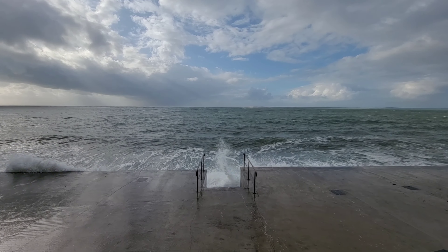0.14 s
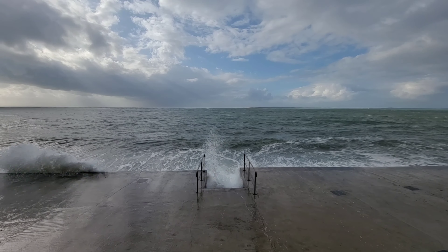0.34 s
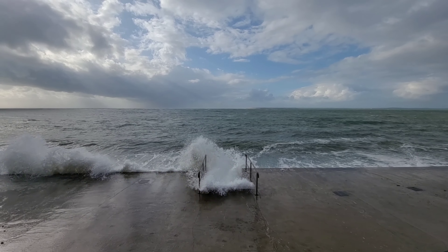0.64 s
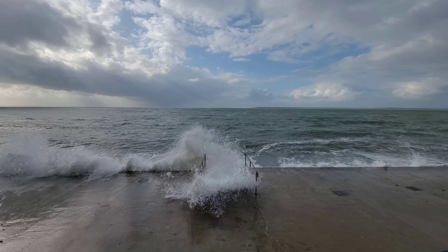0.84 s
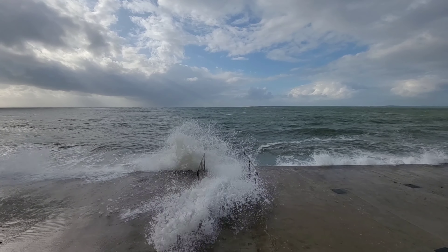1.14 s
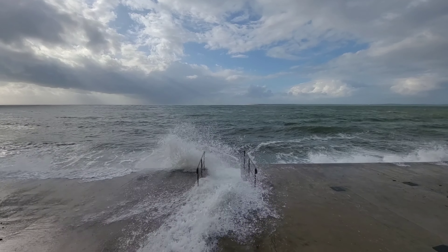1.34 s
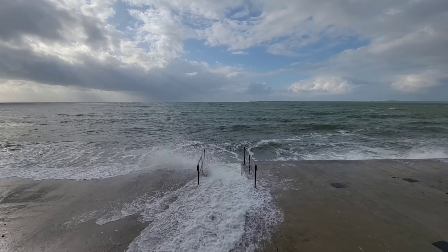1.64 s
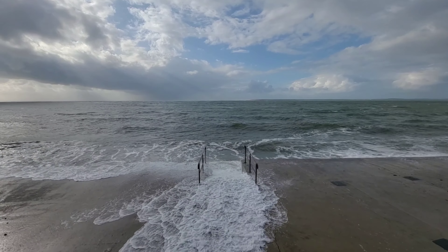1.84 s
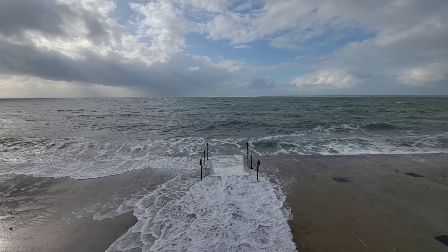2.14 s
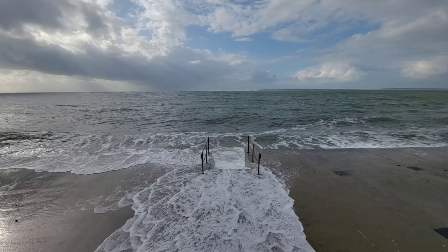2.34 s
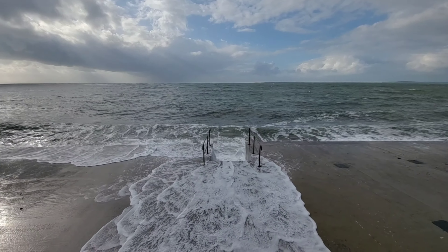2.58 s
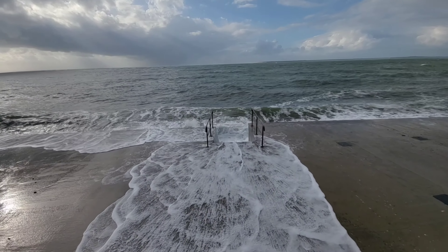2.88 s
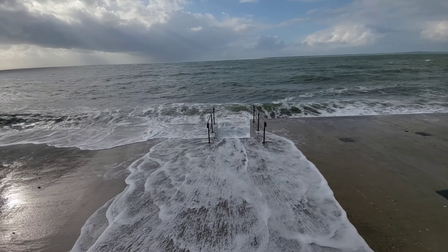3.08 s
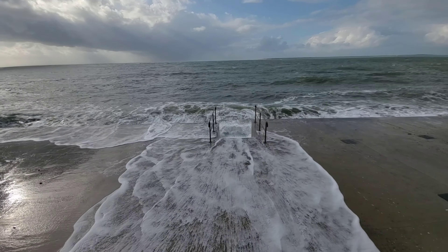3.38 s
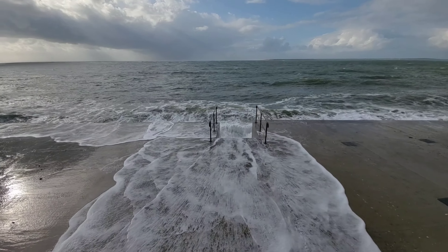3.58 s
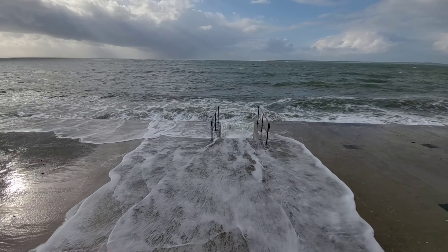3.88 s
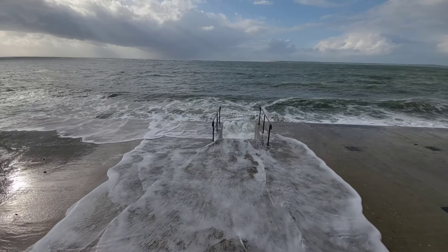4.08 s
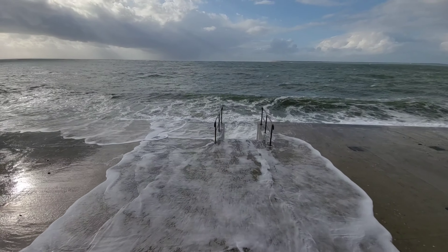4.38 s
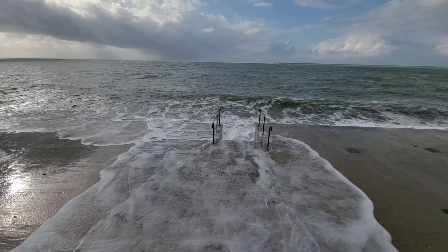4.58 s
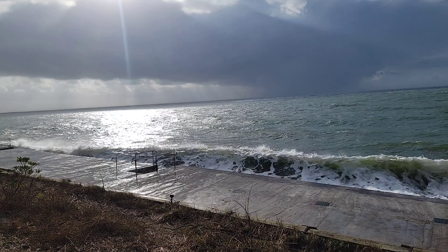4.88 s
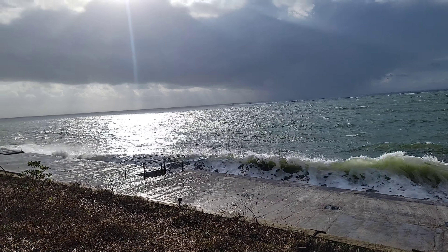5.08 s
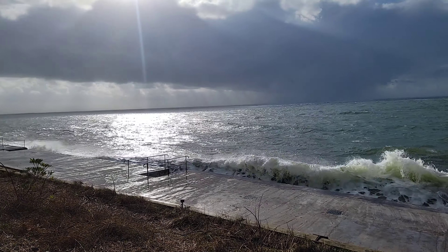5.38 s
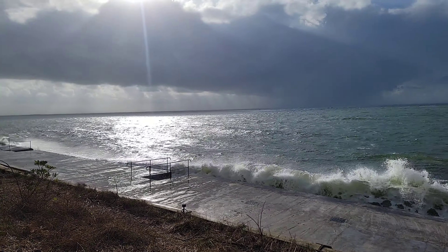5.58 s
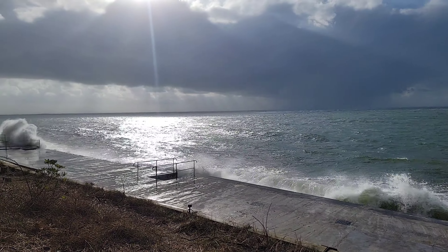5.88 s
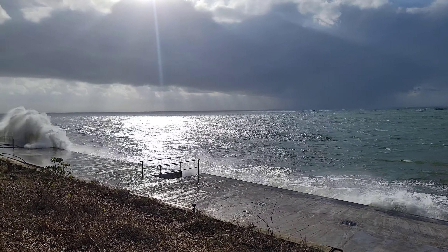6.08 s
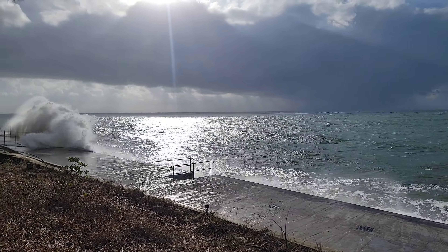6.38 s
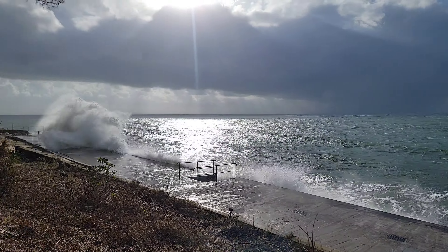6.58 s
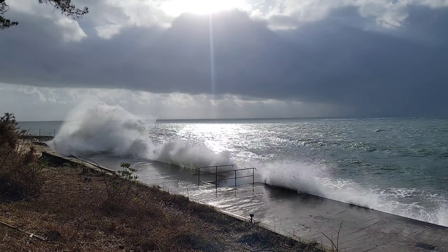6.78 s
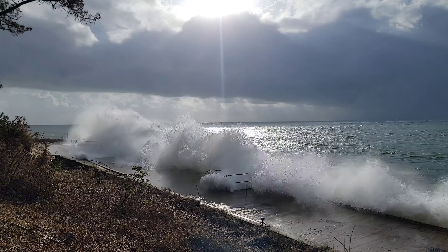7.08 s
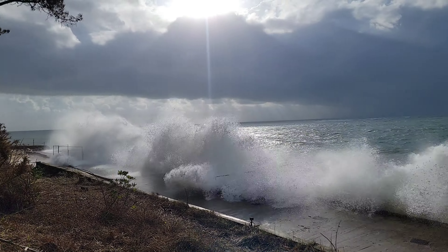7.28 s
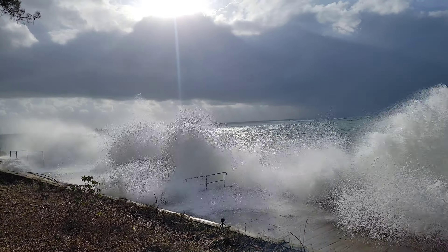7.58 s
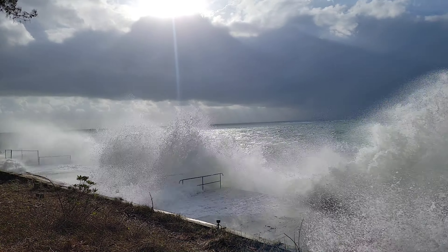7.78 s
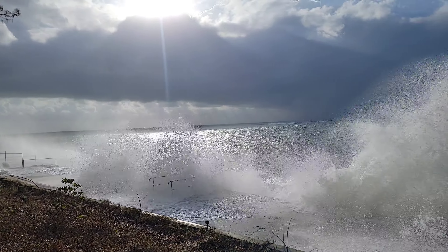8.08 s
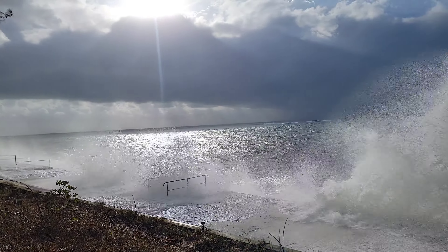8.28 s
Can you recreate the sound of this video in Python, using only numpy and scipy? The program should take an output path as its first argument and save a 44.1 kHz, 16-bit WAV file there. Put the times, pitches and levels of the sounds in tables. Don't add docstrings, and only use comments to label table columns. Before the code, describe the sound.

Rough sea crashing on a concrete seawall, watery roar, spatter and fizz, a short dropout, then heavy wind buffeting and a rising burst of spray.

```python
import sys
import numpy as np
from scipy import signal
from scipy.io import wavfile
from scipy.ndimage import uniform_filter1d

SR = 44100
rng = np.random.default_rng(int(sys.argv[2]) if len(sys.argv) > 2 else 0)


def convert_level_to_amplitude(level_db):
    exponent = np.asarray(level_db, float) / 20
    return 10 ** exponent


def generate_wav(signal):
    frames = np.transpose(np.atleast_2d(signal))
    scaled = np.clip(frames, -1, 1) * 32767
    pcm = np.round(scaled).astype(np.int16)
    wavfile.write(sys.argv[1], SR, pcm)


N = 372204
CUT_S, START_S, RESET_S = 4.7605, 4.9135, 6.6825

# time in seconds, tumble in dB, spray in dB,
# fineness of the drops in dB, lean to the left in dB.
SURF = [(0, -33.5, -25, 9.5, 1.5), (.7, -31.5, -20.5, 0.5, 1), (1.1, -32, -15, 8.5, 3),
        (1.62, -30, -11.5, 6.5, 0.5), (1.95, -38.5, -15.5, 0, -2.5), (2.16, -40, -33, 6.5, -1),
        (2.75, -38.5, -31.5, 2.5, -1), (3.55, -33, -22, -0.5, -1.5), (4.32, -33, -21, -4, -4),
        (4.77, -37.5, -27.5, -3, 4.5), (4.9, -31.5, -36.5, 1, 1), (5.5, -34, -36, -1, 0.1),
        (5.8, -29.5, -29, 0.1, 1), (6.56, -30.5, -32.5, -1.5, 1), (6.64, -26.5, -29.5, 0.5, 0.8),
        (7.75, -26.5, -21.5, 2, -1), (7.83, -25, -16.5, 3.5, 0.1), (8.44, -23.5, -18, 2, 0.7)]
# middle in seconds, half width in seconds,
# tumble in dB, spray in dB, extra depth in dB.
HEAVES = [(.02, 0.23, 2, 0, -7), (.13, 0.12, -3, -3, 7), (.27, 0.15, 1.5, 1, 2.5), (.58, .09, 1.5, 3.5, 6),
          (.85, .08, -1, 1, -5), (.97, 0.097, 3, 0.3, -3), (1.16, 0.1, 0, 1, 1), (1.31, 0.28, 5, 1.5, -3),
          (1.51, 0.18, 2, -2.2, -8.5), (1.65, .12, -.6, -0.7, -11), (1.9, .2, 2.5, -1.3, -2),
          (2.24, .06, 2, 1, 5), (2.9, 0.39, 0, -0.5, -3), (3.21, .08, 2.5, -1, -1),
          (3.35, 0.14, 0.3, -2.5, -1.5), (3.92, 0.25, -1.5, -1.6, 0), (5.2, 0.14, 0, 2.5, -1),
          (6.05, .15, 2.5, 1.5, 6), (6.63, .04, 1, -2.7, 6), (6.68, 0.036, 1.5, -3.5, 10),
          (7.14, .1, 0.5, 1.1, -2), (7.6, 0.17, 1.9, 0.2, -6), (8.05, 0.22, 1.8, 2.5, 5.5)]
# time in seconds, change of the water level in dB, 60 dB
# decay in seconds.
SLAPS = [
    (.255, 6, .1),
    (.367, 5, 0.076),
    (.457, 1.5, .05),
    (.583, 3.5, 0.085),
    (.804, 6.5, 0.052),
    (1.131, 4, 0.055),
    (1.28, 5, 0.043),
    (1.445, 3.5, .08),
    (6.62, 3.5, .15),
    (7.79, -2, 0.13),
]
# depth of the tumble
# in dB, its loss in dB per dB of heavy spray, mist below the spray in dB, crispness in dB.
DROPS = [(0, 0.8, -22, -2.15), (-4.1, .3, -18, -1.7), (-2.2, 0.9, -17.5, -3.2)]
# tumble left of right in dB, spray left of right
# in dB, wind right of left in dB, right port trim in dB.
PORTS = [
    (-16.5, -30.5, -4, -0.13),
    (-17.5, -22.5, 14, -0.07),
    (-17, -22, 0.7, -2),
]
# frequency in Hz, level in dB.
LEFT_SLIPWAY = [(300, 21), (400, 7), (540, 15), (1000, 10), (1500, 7.5), (2400, 5.5), (3500, 2.5),
                (5000, -2.5), (7000, -4), (8500, -3.5), (11000, -6.5), (13000, -4), (15000, -5.5),
                (15900, -15.5)]
RIGHT_SLIPWAY = [(400, -2), (550, -1.5), (800, -7.5), (1600, -8.5), (2480, -11), (2950, -7), (3400, 3.5),
                 (4300, 2), (5700, 4.5), (6400, -3), (8300, -19), (11800, -30.5), (14200, -12.5),
                 (15950, -16.5)]
LEFT_WALL = [(300, 10), (410, -8), (540, 8.5), (1000, 6.5), (1500, 2.5), (2400, 1.5), (3500, 1.5),
             (5000, -1.5), (7000, -4.5), (8500, -4), (11000, -12), (13000, -10.5), (15000, -11),
             (15900, -19)]
RIGHT_WALL = [(300, 3.5), (600, 7), (1700, -2), (2600, -2.5), (3800, 0.5), (4700, -4), (6200, 1),
              (7200, -2), (8600, -13), (11800, -19.5), (12800, -17.5), (14000, -18), (15200, -24.5),
              (15950, -28)]
# frequency in Hz, likeness from 0 to 1.
ROAR_ALIKE = [(300, 1), (500, 0.8), (800, 0.7), (1400, 0), (3000, 0.2)]
# time in seconds, level in dB.
WIND = [(0, -29), (.55, -31.5), (.7, -36), (1.2, -41), (1.7, -41.5), (2.5, -41), (3.1, -38), (3.7, -35.5),
        (4.2, -34.5), (4.77, -42), (4.9, -40), (5.52, -40), (5.75, -35.5), (6.1, -33), (6.7, -31.5),
        (7.1, -34), (7.8, -37), (8.44, -33.5)]
# time in seconds, left change in dB, right change in dB.
FLURRIES = [(.234, 8, -8), (0.325, 13, 1), (.584, 6, 0), (1.322, 11, -9), (1.55, 5, -1), (1.631, -6, -14),
            (1.79, 6, -5), (2.0, 10, -4), (2.085, 6, 0.5), (2.4, 0, 1), (2.679, 5, -2), (2.96, -1, 3),
            (3.218, 11.5, 4), (3.317, 6, 5), (3.372, .1, 2), (3.442, 6, -1), (3.542, 8, 11), (4.26, 4, 0),
            (5.296, 1.5, 2.5), (5.456, -2, -3), (5.7, 10, 9), (5.96, 3, 2), (6.09, 9, 8.5),
            (6.189, 0, -0.5), (6.718, 2, -1), (6.92, 3, 1), (7.4, 0, 3), (7.771, -1.5, -4), (7.88, 3, 3),
            (7.985, 6, 8)]
# frequency in Hz, level in dB.
BREEZE = [(15, -49), (40, -13), (65, 2.5), (135, -4), (230, -7.5), (350, -13.5), (600, -21), (1500, -48.5)]
GUST = [(15, -45), (40, -14), (58, 2.5), (102, -2.7), (189, -8.5), (270, -15), (400, -29), (2500, -65)]
# end of the stretch in seconds, likeness at 80 Hz from 0 to 1,
# likeness at 250 Hz from 0 to 1.
WIND_ALIKE = [(4.8, 0.48, 1), (6.683, .99, 0.63), (9., 0.86, 1)]
# time in seconds, left peak in dB, right peak in dB,
# frequency in Hz.
THUMPS = [
    (0.227, -22, -37, 95),
    (0.317, -19, -36, 75),
    (2.005, -22, -40, 90.5),
    (5.716, -23, -8, 95),
    (6.091, -19, -1, 88),
    (6.251, -23, -6, 90),
    (6.675, -26, -11.5, 121),
    (7.875, -27, -30, 110),
]


def roar(tumble_db, spray_db, deeper_db, fine_db, lean_db):
    aside_db, _, _, trim_db = stretches(PORTS)
    deep_db, loss, _, _ = stretches(DROPS)
    left_db = tumble_db + aside_db + lean_db
    right_db = tumble_db + trim_db
    heavy_db = np.maximum(spray_db + 19.5, 0)
    depth_db = deep_db + deeper_db - loss * heavy_db

    def shape(hz, t):
        depth = 1 + (convert_level_to_amplitude(2 * at(depth_db, t)) - 1) * (1 - above(hz, 750, 3.2))
        return ports(hz, t) * above(hz, 212, 4.4) * (1 - above(hz, 2950, 5.7)) * depth

    def alike(hz, t):
        return read(ROAR_ALIKE, hz)

    def lead(hz, t):
        return np.where(t < CUT_S, .45, -.6) * hz / 800

    drive = droplets(per_s=900, spread_db=5.7, share=0.099)
    body = colour(drive, shape, alike, lead, 550, 2400, patchy_db=0.56, flicker_db=0.2, size=512)
    return body * convert_level_to_amplitude(np.array([left_db + .5, right_db - .7]) + .5 * slaps_db())


def spray(tumble_db, spray_db, deeper_db, fine_db, lean_db):
    _, aside_db, _, trim_db = stretches(PORTS)
    _, _, mist_db, crisp_db = stretches(DROPS)
    left_db = spray_db + aside_db + .3 * lean_db
    right_db = spray_db + trim_db
    s = np.arange(N) / SR
    tilt_s = np.where(s < CUT_S, s - 2.2, 0)
    mist_db = mist_db + fine_db + 3 * tilt_s
    crisp_db = crisp_db + .7 * fine_db
    drive = droplets(per_s=2500, spread_db=4.7, share=.12)

    def apart(hz, t):
        return 0 * hz

    def top_cavity(hz, t):
        edge_hz = np.where(t < CUT_S + .07, 13150 + 130 * t, 12400)
        return above(hz, edge_hz, 130.)

    def fizz_shape(hz, t):
        crisp = 1 + (convert_level_to_amplitude(2 * at(crisp_db, t)) - 1) * above(hz, 5700, 6.0)
        body = ports(np.minimum(hz, 11800), t) * above(hz, 3320, 4.3)
        return body * (1 - top_cavity(hz, t)) * crisp

    def mist_shape(hz, t):
        return ports(hz, t, (14000, 12900)) * top_cavity(hz, t)

    fizz = colour(drive, fizz_shape, apart, apart, 3000, 12000, patchy_db=0.51, flicker_db=0.27, size=256)
    mist = colour(drive, mist_shape, apart, apart, 12500, 15300, patchy_db=0.73, flicker_db=.4, size=256)
    left_mist_db = -15.0 + .2 * (mist_db + 16) + .5 * crisp_db
    mist *= convert_level_to_amplitude(np.array([left_mist_db, mist_db]))
    return (fizz + mist) * convert_level_to_amplitude(np.array([left_db, right_db]) + slaps_db())


def slaps_db():
    s, db, t60 = np.transpose(SLAPS)[..., None]
    t = np.arange(0, N / SR, .002)
    rise = np.clip((t - s) / 0.0052 + 1, 0, 1)
    lift = db * rise * convert_level_to_amplitude(-60 * np.maximum(t - s, 0) / t60)
    return np.interp(np.arange(N) / SR, t, lift.sum(0))


def droplets(per_s, spread_db, share):
    sizes = convert_level_to_amplitude(spread_db * np.minimum(rng.exponential(1, (N, 2)), 5))
    drops = sizes * (rng.random((N, 2)) < per_s / SR)
    drops *= rng.choice([-1., 1.], (N, 2))
    hiss = rng.standard_normal((N, 2)).T
    return np.sqrt(1 - share) * hiss + np.sqrt(share) * evened(drops.T)


def water():
    tumble_db, spray_db, fine_db, lean_db = curves(SURF)
    s, half_s, *heights_db = np.transpose(HEAVES)
    heave_db = swells(s, half_s, np.array(heights_db))
    return tumble_db + heave_db[0], spray_db + heave_db[1], heave_db[2], fine_db, lean_db


def ports(hz, t, from_hz=(0, 0)):
    slipway_hz, wall_hz = np.maximum(hz, from_hz[0]), np.maximum(hz, from_hz[1])
    slipway = convert_level_to_amplitude(np.array([read(p, slipway_hz) for p in (LEFT_SLIPWAY, RIGHT_SLIPWAY)]))
    wall = convert_level_to_amplitude(np.array([read(p, wall_hz) for p in (LEFT_WALL, RIGHT_WALL)]))
    return np.where(t < CUT_S + .07, slipway ** 2, wall ** 2)


def thumps():
    half = 900
    out, t = np.zeros((2, N)), np.arange(-half, half) / SR
    for s, left_db, right_db, hz in THUMPS:
        swing = np.sin(2 * np.pi * hz * t) * np.exp(-(t * hz / 0.6) ** 2)
        first = round(s * SR) - half
        out[:, first:first + len(t)] += convert_level_to_amplitude(np.array([[left_db], [right_db]])) * swing
    return out


def wind():
    level_db = gusting_db()
    until, deep, high = np.transpose(WIND_ALIKE)

    def shape(hz, t):
        strong = np.clip((at(level_db, t)[:, None] + 35.5) / 14, 0, 1)
        return convert_level_to_amplitude(strong * read(GUST, hz) + (1 - strong) * read(BREEZE, hz)) ** 2

    def alike(hz, t):
        stretch = np.searchsorted(until, t)
        return deep[stretch] + (high - deep)[stretch] * above(hz, 140, 3.)

    def lead(hz, t):
        return .3 - hz / 1200

    drive = rng.standard_normal((N, 2)).T
    lumps = colour(drive, shape, alike, lead, 30, 300, patchy_db=0.34, flicker_db=0.77, size=2048)
    lumps /= (uniform_filter1d(lumps ** 2, size=3000, axis=1) + .05) ** 0.54
    return lumps * convert_level_to_amplitude(level_db)


def gusting_db():
    s, *heights_db = np.transpose(FLURRIES)
    _, _, exposed_db, trim_db = stretches(PORTS)
    flurry_db = swells(s, 0.057, np.array(heights_db))
    return curves(WIND) + flurry_db + np.array([0 * trim_db, exposed_db + trim_db])


def colour(drive, shape, alike, lead, lo_hz, hi_hz, patchy_db, flicker_db, size):
    hz, t, z = signal.stft(drive, SR, nperseg=size, noverlap=size * 3 // 4)
    same = np.clip(alike(hz[:, None], t), 0, 1)
    shared = z[1] * np.exp(1j * lead(hz[:, None], t))
    z[0] = same * shared + np.sqrt(1 - same ** 2) * z[0]
    power = shape(hz[:, None], t)
    band = (hz >= lo_hz) & (hz < hi_hz)
    power = power / power[:, band].sum(1, keepdims=True) * len(hz)
    uneven = patchy_db * patches(z.shape[1:], bins=6, frames=10)
    uneven = uneven + flicker_db * patches((1, len(t)), bins=1, frames=2)
    z = z * np.sqrt(power) * convert_level_to_amplitude(uneven)
    return signal.istft(z, SR, nperseg=size, noverlap=size * 3 // 4)[1][:, :N]


def patches(shape, bins, frames):
    z = rng.standard_normal(shape[::-1]).T
    for _ in range(2):
        z = uniform_filter1d(uniform_filter1d(z, bins, axis=0), frames, axis=1)
    return evened(z)


def swells(s, half_s, heights_db):
    t = np.arange(0, N / SR + .004, .004)
    bump = np.maximum(1 - abs(t - s[:, None]) / np.reshape(half_s, (-1, 1)), 0)
    return np.array([np.interp(np.arange(N) / SR, t, c) for c in heights_db @ bump])


def stretches(rows):
    return np.transpose(rows)[:, np.searchsorted([START_S - .07, RESET_S], np.arange(N) / SR)]


def curves(rows):
    s, *columns = np.transpose(rows)
    return np.array([np.interp(np.arange(N) / SR, s, c) for c in columns])


def at(curve, t):
    return curve[..., np.minimum(t * SR, N - 1).astype(int)]


def read(points, hz):
    f, value = np.transpose(points)
    return np.interp(np.log(hz + 1), np.log(f + 1), value)


def above(hz, edge_hz, slope):
    return 1 / (1 + (edge_hz / (hz + 1)) ** slope)


def evened(x):
    return x / np.sqrt(np.mean(x ** 2) + 1e-20)


def scene():
    sea = water()
    return roar(*sea) + spray(*sea) + wind() + thumps()


def ragged_treble(x):
    hz, t, z = signal.stft(x, SR, "cosine", nperseg=2048, noverlap=1024)
    hz, power = hz[:, None], abs(z) ** 2
    share = uniform_filter1d(power, size=7, axis=1) / uniform_filter1d(power, size=40, axis=1)
    faint = np.array([.55 * (hz > 3500), .42 * (hz > 8800) * (hz < 13000)])
    blink = (rng.random((len(t), 2)).T < [[.3], [.02]])[:, None] & (hz > 15400)
    kept = z * ~((share < faint) | blink)
    return signal.istft(kept, SR, "cosine", nperseg=2048, noverlap=1024)[1][:, :N]


def fade():
    t = np.arange(N) / SR
    before = np.clip((CUT_S - t) / 0.0022, 0, 1)
    rise = 0.046 + (1 - 0.046) * np.clip((t - START_S) / 0.33, 0, 1) ** 0.97
    return before + np.clip((t - START_S) / 0.0034, 0, 1) * rise


def gain_reset_db():
    since = np.maximum(np.arange(N) / SR - RESET_S, 0)
    climb_db = -24 * np.exp(-since / 0.0073) - 11.5 * np.exp(-since / 0.038)
    return np.clip(since / .002, 0, 1) * climb_db


def roll_off(x):
    return signal.sosfilt(signal.butter(12, 15900, fs=SR, output="sos"), x)


def record(dry):
    reset_db = gain_reset_db()
    gain = fade() * convert_level_to_amplitude(np.array([0 * reset_db, reset_db]))
    mix = 1.54 * np.tanh(ragged_treble(dry) * gain / 1.662)
    return roll_off(mix)


dry = scene()
out = record(dry)
generate_wav(out)
```